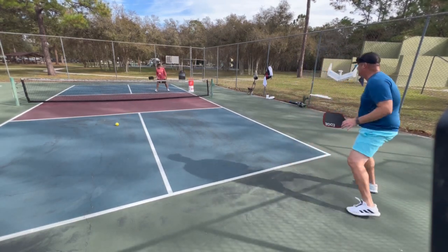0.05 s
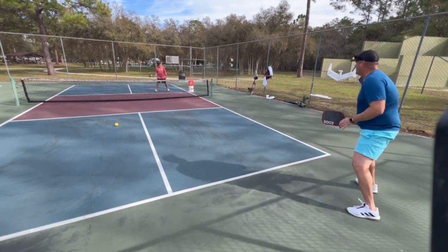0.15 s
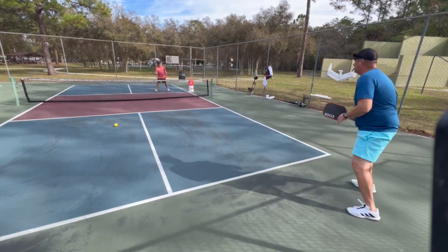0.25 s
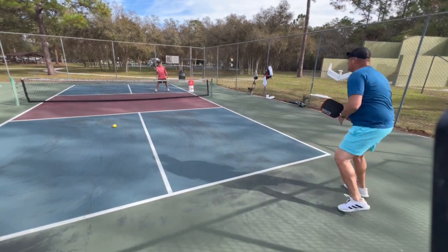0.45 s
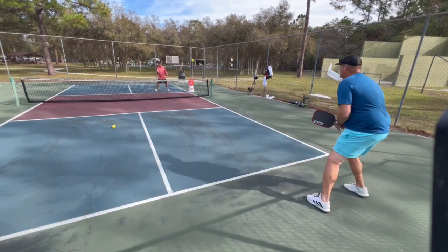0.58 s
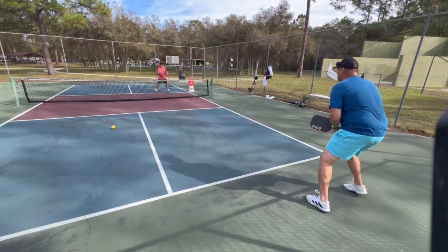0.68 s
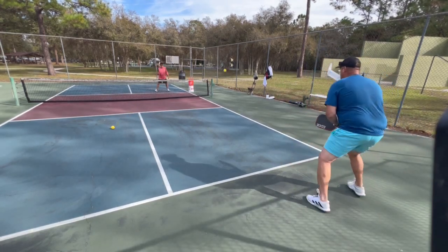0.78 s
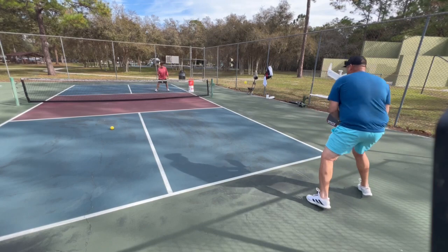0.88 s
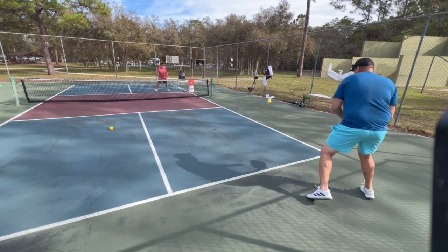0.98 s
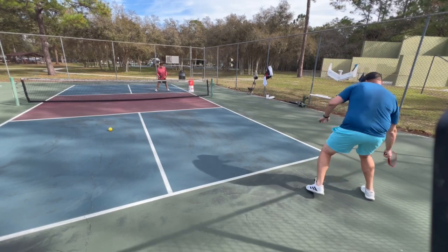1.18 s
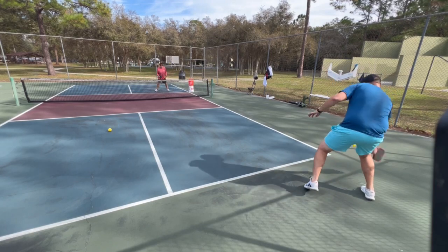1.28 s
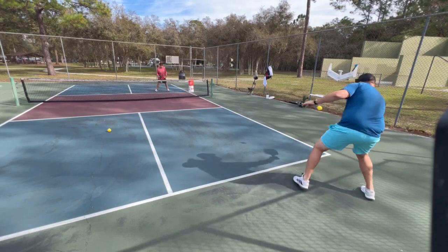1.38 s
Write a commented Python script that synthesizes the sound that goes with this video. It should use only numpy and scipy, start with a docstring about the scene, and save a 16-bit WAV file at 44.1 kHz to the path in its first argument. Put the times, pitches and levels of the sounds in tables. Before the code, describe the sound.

Sharp paddle hits on a plastic ball echo outdoors as shoes scrape the gritty court.

```python
"""An outdoor pickleball court. A low rumble, faint hiss and the dying echo of earlier play lie underneath.
At 0.2 s two loud paddle pops sound close by and echo off fences and trees. The near player's shoes
scuff the gritty surface, the ball bounces at 1.2 s and a sole squeaks faintly. He returns the ball,
a lighter knock follows and his shoes land with a dull pat."""
import sys
import numpy as np
from scipy import signal
from scipy.fft import rfft, irfft
from scipy.io import wavfile
from scipy.ndimage import uniform_filter1d, minimum_filter1d

SR = 44100
rng = np.random.default_rng(int(sys.argv[2]) if len(sys.argv) > 2 else 0)


def to_wav(sig):
    """Store sig (one row per channel, or 1-D mono) as 16-bit WAV at the path in sys.argv[1].

    Samples outside -1..1 are clipped; the rate is SR.
    """
    pcm = np.clip(np.atleast_2d(sig), -1, 1) * 32767
    pcm = np.round(pcm).astype(np.int16)
    wavfile.write(sys.argv[1], SR, pcm.T)  # frames by channels


N = 63945
T = np.arange(N) / SR
HZ = np.maximum(np.arange(N // 2 + 1) * SR / N, 1)
SIDES = np.array([[.5], [-.5]])  # left, right


def from_db(db):
    """Decibels to gain."""
    return 10 ** (np.asarray(db) / 20)


def unit_rms(x):
    """Scale to unit power."""
    return x / np.sqrt(np.mean(x ** 2) + 1e-20)


def per_hz(points):
    """Join (hz, value) points on a log-frequency axis."""
    hz, value = np.transpose(points)
    return np.interp(np.log(HZ), np.log(hz), value)


def pan(pan_db):
    """Stereo gains; pan_db is left minus right."""
    return from_db(SIDES * pan_db)


def filtered(x, bin_gain):
    """Apply a gain per frequency bin."""
    return irfft(rfft(x) * bin_gain, N)


def colour(x, spectrum):
    """Shape by (hz, db) points; unit power."""
    return unit_rms(filtered(x, from_db(per_hz(spectrum))))


def noise(spectrum):
    """Coloured noise, independent left and right."""
    return colour(rng.standard_normal((2, N)), spectrum)


def decay(t, t60_s):
    """Silent before t = 0, then exponential decay."""
    return (t >= 0) * from_db(-60 * np.maximum(t, 0) / t60_s)


def rise(t, rise_s):
    """Linear ramp, 0 to 1."""
    return np.clip(t / rise_s, 0, 1)


def background():
    """Low rumble and faint hiss; the level flutters."""
    # spectrum: freq_hz, level_db
    air_spectrum = [(15, -43), (31, -8.5), (44, -0.5), (72, 1.5), (140, -4), (220, -10.5), (400, -22),
                    (800, -23), (1400, -24.5), (2500, -38), (5000, -43.5), (9000, -53.5), (12000, -62),
                    (16000, -60)]
    # balance: freq_hz, pan_db
    air_pan = [(50, -1.5), (150, -3.5), (500, -2), (1500, -1), (4000, 4), (9000, -2.5)]
    # left-right likeness: freq_hz, correlation
    air_likeness = [(50, .8), (150, 0.82), (400, 0.14), (900, -0.75), (3000, -0.34)]
    mid, side = rfft(rng.standard_normal((2, N)))
    correlation = per_hz(air_likeness)
    stereo_bins = np.sqrt(1 + correlation) * mid + np.sqrt(1 - correlation) * side * [[1], [-1]]
    air = colour(irfft(stereo_bins * pan(per_hz(air_pan)), N), air_spectrum)
    flutter_db = 2.5 * unit_rms(filtered(rng.standard_normal(N), np.exp(-HZ / 12)))
    return from_db(-41.5 + flutter_db) * air


def earlier_echo():
    """Dying echo of earlier play."""
    # spectrum: freq_hz, level_db
    echo_spectrum = [(200, -18), (500, 1.5), (900, -14), (1450, 9.5), (2200, -6.5), (5000, -16),
                     (12000, -25.5)]
    return from_db(-52) * noise(echo_spectrum) * decay(T, t60_s=2.1)


def grit(spectrum):
    """Dense sand clicks over smooth friction noise, through the sole's resonances."""
    # sole resonances: centre_hz, width_hz, gain_db
    sole_peaks = [(2250, 190, 4), (2800, 130, 4.5), (3770, 400, 3.5), (4850, 500, 3.5), (6320, 520, 6),
                  (7960, 330, 4), (9600, 230, -3)]
    clicks_per_s, click_share = 1200, 0.42
    sizes = from_db(np.minimum(rng.exponential(1, N), 5))
    clicks = (rng.random(N) < clicks_per_s / SR) * sizes * rng.standard_normal((2, N))
    smooth = rng.standard_normal((2, N))
    friction = np.sqrt(click_share) * unit_rms(clicks) + np.sqrt(1 - click_share) * smooth
    peaks_db = sum(db / (1 + (2 * (HZ - hz) / width_hz) ** 2) for hz, width_hz, db in sole_peaks)
    return colour(filtered(friction, from_db(peaks_db)), spectrum)


def scuffs():
    """Soles slide on grit: bright hiss first, a lower grind as weight comes on."""
    # slides: start_s, length_s, attack_s, release_s, level_db, pan_db, grind_db
    slides = [(-0.001, 0.052, 0.055, .012, -48, 1, -4), (0.156, 0.03, 0.022, .01, -59, 3, 3.5),
              (0.551, .011, 0.0061, 0.0053, -37.5, 1, -1.5), (0.815, 0.19, 0.016, 0.026, -69.5, 15, -7),
              (0.877, 0.028, 0.0069, 0.019, -74.5, 2, 15.5), (1.041, 0.072, 0.019, .007, -35, 0, -5.5),
              (1.203, 0.011, 0.0064, 0.021, -55, 1, -6), (1.265, 0.015, 0.015, 0.019, -65, 3, 8),
              (1.344, 0.03, 0.015, 0.011, -59.5, 7, 9)]
    # friction spectra: freq_hz, level_db
    hiss_spectrum = [(1000, -32), (2500, -2), (4500, -0.5), (6400, 3), (9400, 10), (11000, -12),
                     (13000, -5.5), (16000, -29)]
    grind_spectrum = [(300, -18), (900, -7.5), (1500, -5), (2300, -2.5), (3800, 0.5), (6000, -3.5),
                      (12000, -29)]
    grind_lag_s = 0.011
    hiss, grind = grit(hiss_spectrum), grit(grind_spectrum)
    out = 0
    for start_s, length_s, attack_s, release_s, level_db, pan_db, grind_db in slides:
        for layer, lag_s in ((hiss, 0), (from_db(grind_db) * grind, grind_lag_s)):
            t = T - start_s - lag_s
            envelope = rise(t, attack_s) * np.exp(-np.maximum(t - length_s, 0) / release_s)
            out += from_db(level_db) * pan(pan_db) * layer * envelope
    return out


def low_cut(x, cutoff_hz):
    """Second-order high-pass: small bodies radiate little bass."""
    return signal.sosfilt(signal.butter(2, cutoff_hz, "high", fs=SR, output="sos"), x + 1e-18)


def ring(t, modes):
    """A struck body rings as a sum of damped modes."""
    return sum(from_db(level_db) * pan(pan_db) * np.sin(2 * np.pi * pitch_hz * t) * decay(t, t60_s)
               for pitch_hz, level_db, t60_s, pan_db in modes)


def thump(t, pitch_hz, peak_s):
    """Short low pulse, starting 1 ms into the blow."""
    age_s = np.maximum(t - 0.001, 0)
    return np.sin(2 * np.pi * pitch_hz * age_s) * age_s / peak_s * np.exp(1 - age_s / peak_s)


def blows():
    """Paddle and ball impacts: ring, thump, crack, ground reflection. Returns (direct, court send)."""
    # body modes: pitch_hz, level_db, t60_s, pan_db
    first_paddle = [(1060, -37, .022, -19), (1364, 2, 0.021, -0.3), (1793, -11.5, 0.00592, 18.5),
                    (3020, -17.5, 0.012, 4), (3487, -22.5, 0.019, 2.5), (4890, -26, 0.024, 9)]
    second_paddle = [(864, -28.5, .04, -15), (1077, -0.5, 0.034, -5.7), (1366, -19.5, 0.039, 14),
                     (1730, -10, 0.017, 6.5), (2740, -30, .03, 5), (3900, -19, 0.013, -1)]
    ball = [(570, -24.5, 0.011, -4.5), (1280, -41.5, .018, 6), (1810, -37, 0.016, -11.5),
            (3026, -29.5, 0.014, -8), (3930, -37.5, 0.014, -15)]
    near_paddle = [(745, -21.5, 0.027, -11.5), (878, -12.5, 0.009, -8.5), (1494, -17.5, 0.041, 0),
                   (2020, -27.5, 0.046, -9), (2375, -29, 0.027, -3), (3160, -26.5, 0.014, 4)]
    light_knock = [(660, -30.5, 0.029, -6), (1545, -35.5, 0.054, 3), (2460, -32, 0.018, -3.5),
                   (3840, -40, 0.045, 3.5)]
    # crack spectra: freq_hz, level_db
    first_crack = [(400, 4), (1800, 9), (2500, 4), (3500, -4.5), (6000, 3.5), (9000, -1), (11000, -15),
                   (13500, 0), (16000, -21)]
    second_crack = [(3100, -36), (3900, 1.5), (9000, 5.5), (11000, -7.5), (13500, -12), (16000, -24)]
    near_crack = [(400, -21), (2300, -2), (3500, 0.5), (6000, 3.5), (9000, 6), (11000, -2), (13500, -2),
                  (16000, -14)]
    # one impact per body: start_s, left_lag_s, contact_s, thump_hz, thump_db, thump_pan_db,
    # thump_peak_s, crack_db, crack_t60_s, crack_pan_db, ground_s, ground_db, send_db
    impacts = [(0.1991, -.00024, 0.00083, 443, -13.5, -1.5, 0.00099, -17, 0.024, 1, 0.0037, -20, 5),
               (0.2517, .00007, 0.00097, 390, -15.5, -9, 0.0014, -15, 0.01, 6.5, 0.0046, -29, 0.5),
               (1.1923, .00029, 0.00073, 292, -36, -2, 0.0015, -26, 0.015, 3, .0024, -1, -5),
               (1.34186, .0004, 0.0006, 228, -24.5, -9, 0.0014, -20, 0.018, -2, 0.002203, -6, 4),
               (1.3790, .0001, 0.00038, 330, -42, -9, 0.0013, -44, 0.048, 0, .002, -5, -11)]
    bodies = [(first_paddle, first_crack), (second_paddle, second_crack),
              (ball, near_crack), (near_paddle, near_crack), (light_knock, near_crack)]
    direct, send = 0, 0
    for (modes, crack_spectrum), impact in zip(bodies, impacts):
        (start_s, left_lag_s, contact_s, thump_hz, thump_db, thump_pan_db,
         thump_peak_s, crack_db, crack_t60_s, crack_pan_db, ground_s, ground_db, send_db) = impact
        t = T - start_s - left_lag_s * SIDES
        onset = rise(t, contact_s)
        body = low_cut(onset * ring(t, modes), cutoff_hz=520)
        pulse = from_db(thump_db) * pan(thump_pan_db) * thump(t, thump_hz, thump_peak_s)
        crack = from_db(crack_db) * pan(crack_pan_db) * noise(crack_spectrum)
        blow = body + low_cut(pulse, cutoff_hz=130) + crack * onset * decay(t, crack_t60_s)
        reflection = np.array([np.interp(T - ground_s, T, channel) for channel in blow])
        direct += blow + from_db(ground_db) * reflection
        send += from_db(send_db) * blow
    return direct, send


def court(send):
    """Near surfaces echo, fences and trees scatter, distant woods answer late and dull."""
    # near echoes: delay_s, level_db, pan_db
    echoes = [(0.0134, -33.5, 16), (0.0165, -25.5, -3), (0.0206, -29.5, 8), (0.041, -29.5, 1)]
    # tail spectra: freq_hz, level_db
    scatter_spectrum = [(150, -4), (400, 8.5), (750, 5.5), (1050, 6), (1400, 2), (2200, 14), (5000, 10.5),
                        (9000, 7), (14000, -14)]
    woods_spectrum = [(150, 6.5), (400, -2.5), (750, -6.5), (1420, -2), (2000, 3), (3200, 0), (9000, -18)]
    # scatter balance: freq_hz, pan_db
    scatter_pan = [(300, 7), (1200, 2.5), (3000, 0), (8000, 7)]
    trees_db, trees_s, trees_width_s = 4, .165, .055
    tree_swell = from_db(trees_db * np.exp(-((T - trees_s) / trees_width_s) ** 2))
    scatter = filtered(noise(scatter_spectrum), pan(per_hz(scatter_pan)))
    scatter *= rise(T, 0.0046) * decay(T, t60_s=1.08) * tree_swell
    woods_age_s = T - .15
    woods = noise(woods_spectrum) * rise(woods_age_s, 0.07) * decay(woods_age_s, t60_s=1.17)
    response = (from_db(-21) * unit_rms(scatter) + from_db(-31) * unit_rms(woods)) / np.sqrt(N)
    for delay_s, level_db, pan_db in echoes:
        response[:, int(delay_s * SR)] += from_db(level_db) * pan(pan_db)[:, 0]
    return signal.fftconvolve(send, response, axes=1)[:, :N]


def squeak():
    """A twisting rubber sole gives a faint, slightly falling whistle."""
    peak_s, width_s, pitch_hz, sag_hz_per_s = 1.302, 0.053, 3140, 700
    t = T - peak_s
    phase = 2 * np.pi * np.cumsum(pitch_hz - sag_hz_per_s * t) / SR
    return from_db(-60.5) * np.sin(phase) * np.exp(-(t / width_s) ** 2)


def steps():
    """Each shoe lands with a dull pat."""
    # landings: start_s, level_db, t60_s
    landings = [(1.39, -33.5, 0.088), (1.43, -42.5, 0.18)]
    # spectrum: freq_hz, level_db
    pat_spectrum = [(25, -30), (60, -11), (150, 1), (550, 8.5), (1000, -6), (1600, 1.5), (2500, -24),
                    (8000, -32)]
    pat = pan(1.5) * noise(pat_spectrum)
    return sum(from_db(level_db) * pat * rise(T - start_s, 0.0015) * decay(T - start_s, t60_s)
               for start_s, level_db, t60_s in landings)


def scene():
    """Blows and footwork with their echoes, over the background."""
    direct, send = blows()
    feet = scuffs() + steps()
    return direct + feet + court(send + feet) + squeak() + background() + earlier_echo()


def record(dry):
    """Narrow treble dip of the microphone, fast peak limiter, low-pass."""
    notch_hz, notch_share = 7640, 0.83
    ceiling, limiter_s, cutoff_hz = 0.81, 0.00088, 17000
    notched = signal.lfilter(*signal.iirnotch(notch_hz, Q=17.5, fs=SR), dry)
    mic = dry + notch_share * (notched - dry)
    window = int(limiter_s * SR) + 1
    needed_gain = np.minimum(1, ceiling / (np.abs(mic).max(axis=0) + 1e-9))
    gain = uniform_filter1d(minimum_filter1d(needed_gain, window), window)
    return signal.sosfilt(signal.cheby2(12, 70, cutoff_hz, fs=SR, output="sos"), mic * gain)


dry = scene()
out = record(dry)
to_wav(out)
```